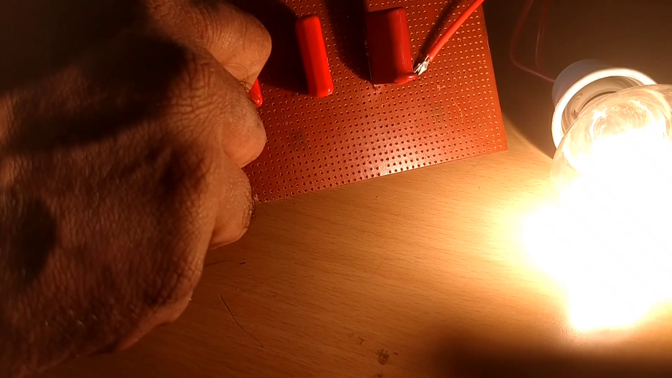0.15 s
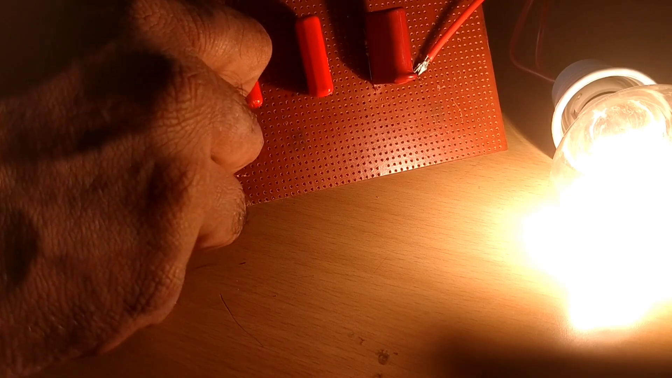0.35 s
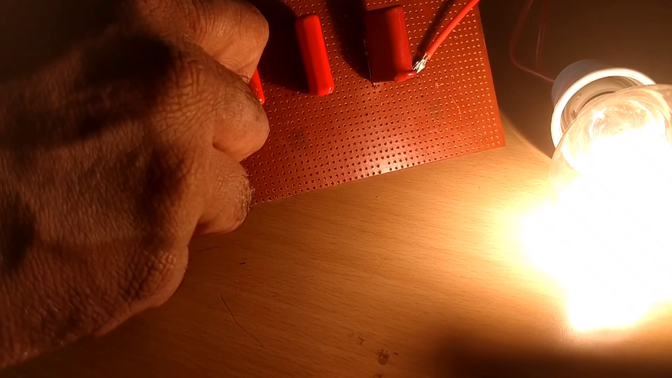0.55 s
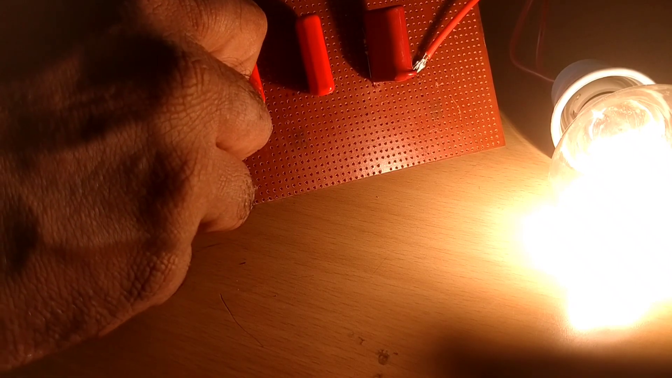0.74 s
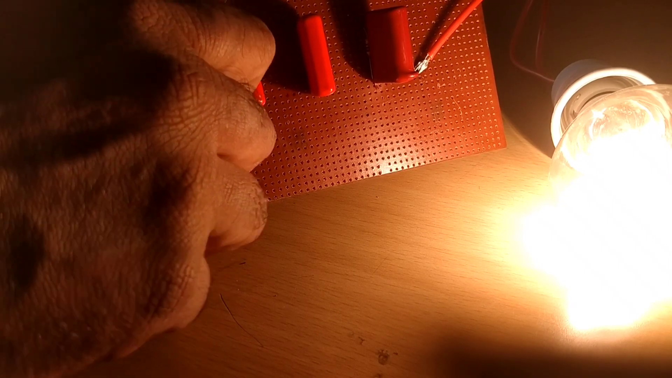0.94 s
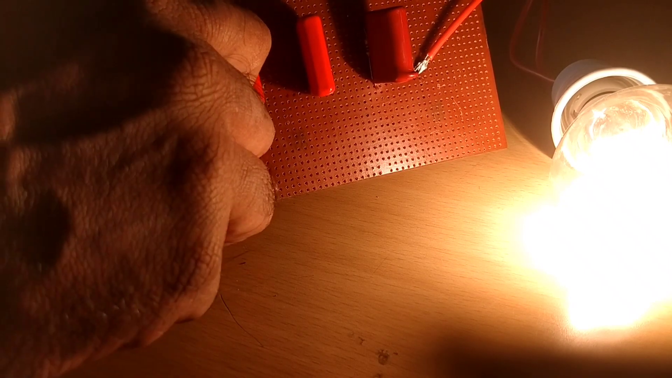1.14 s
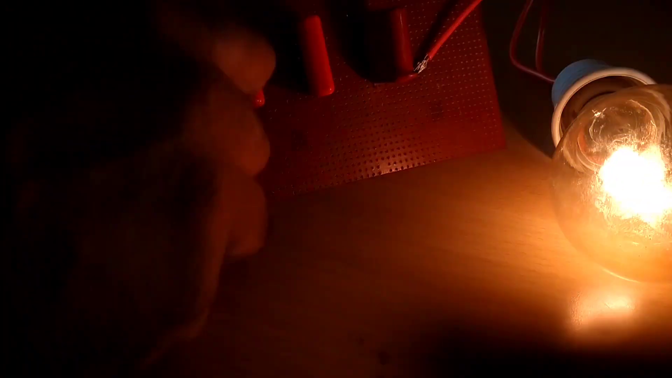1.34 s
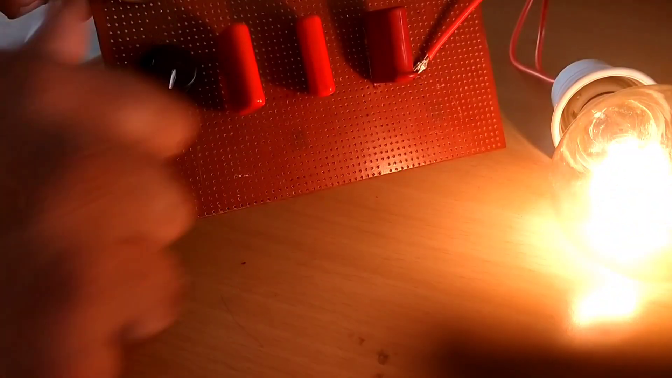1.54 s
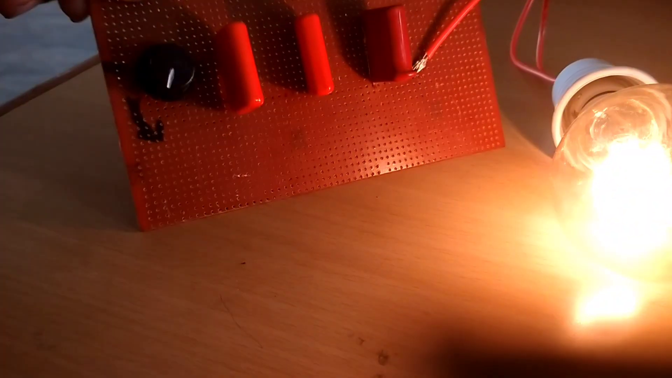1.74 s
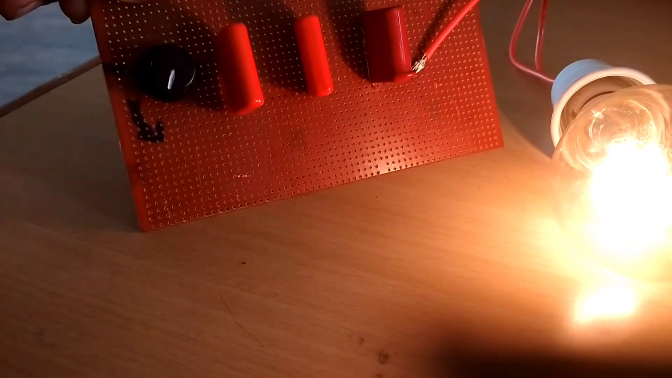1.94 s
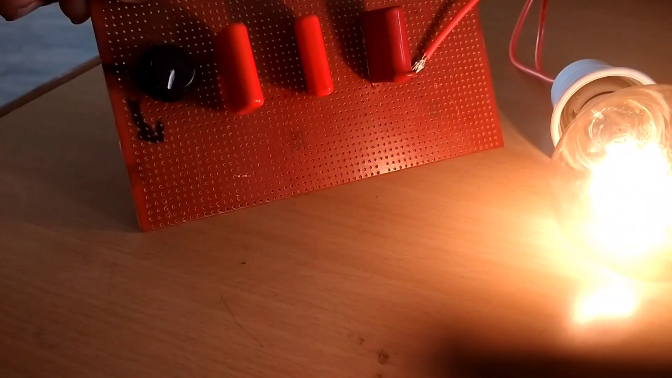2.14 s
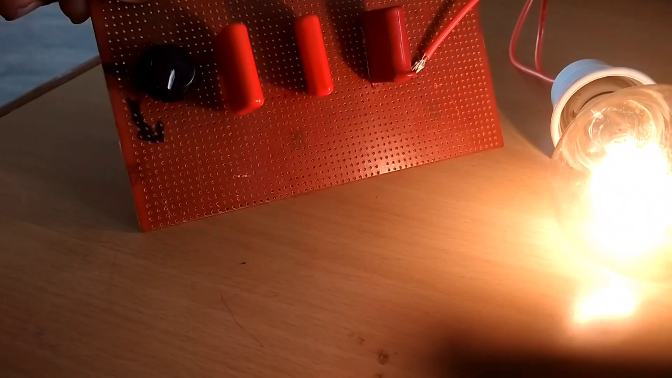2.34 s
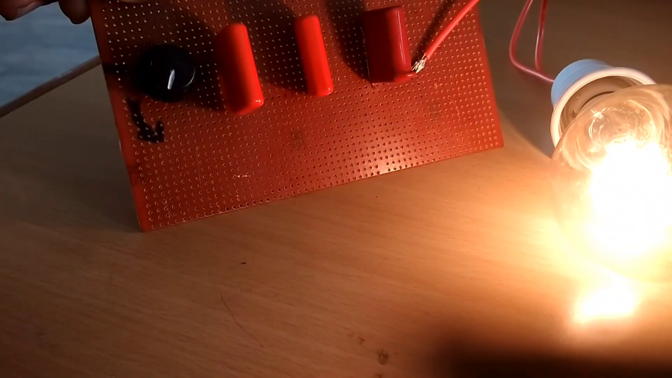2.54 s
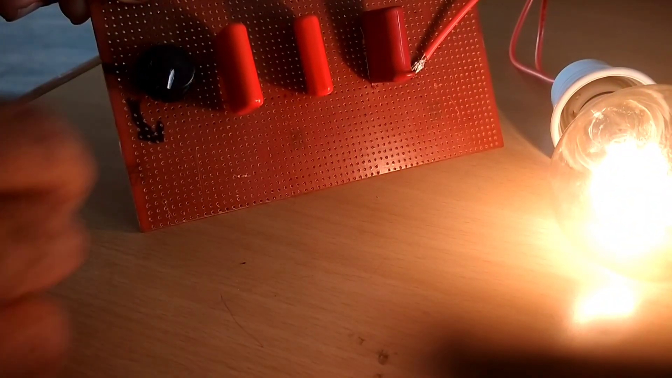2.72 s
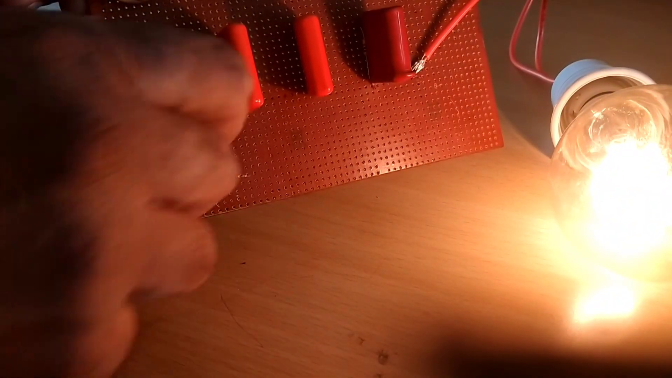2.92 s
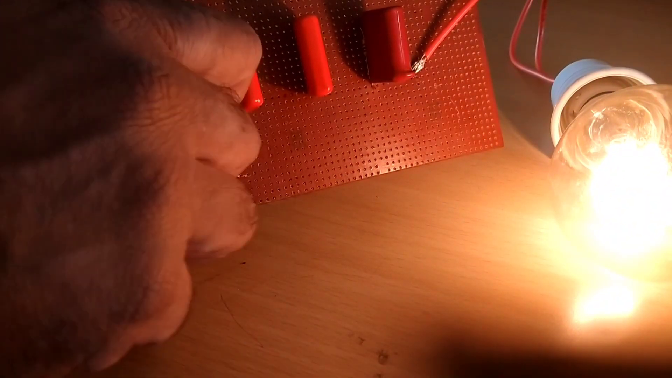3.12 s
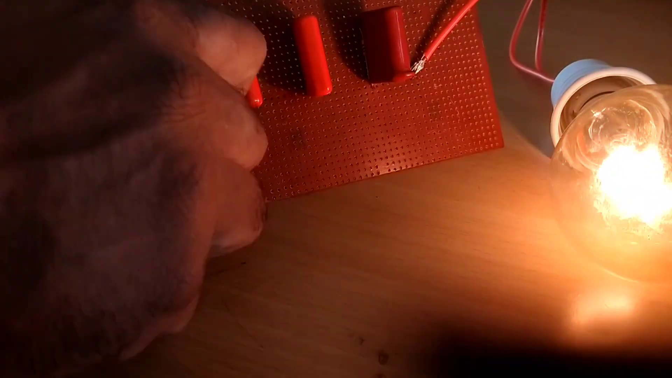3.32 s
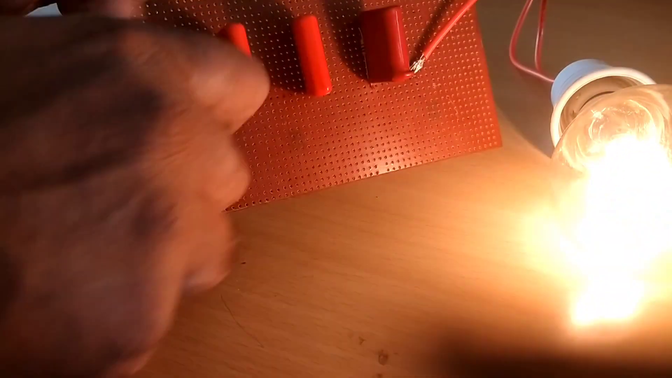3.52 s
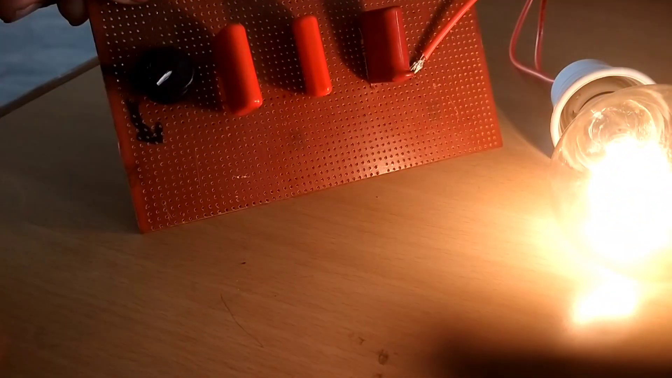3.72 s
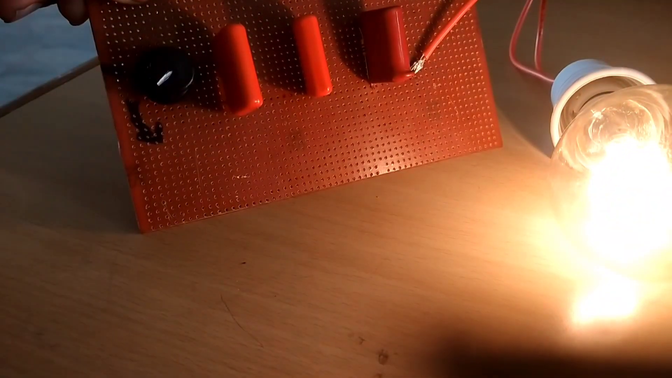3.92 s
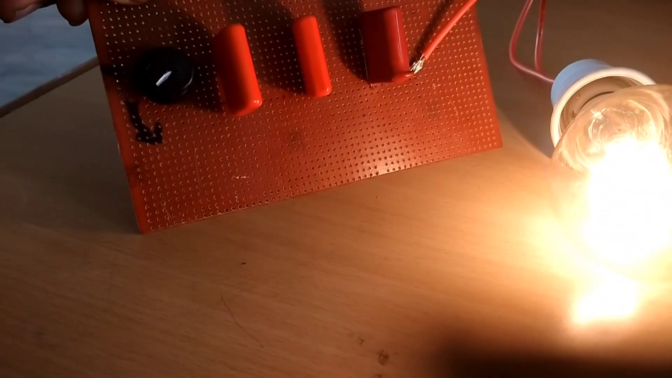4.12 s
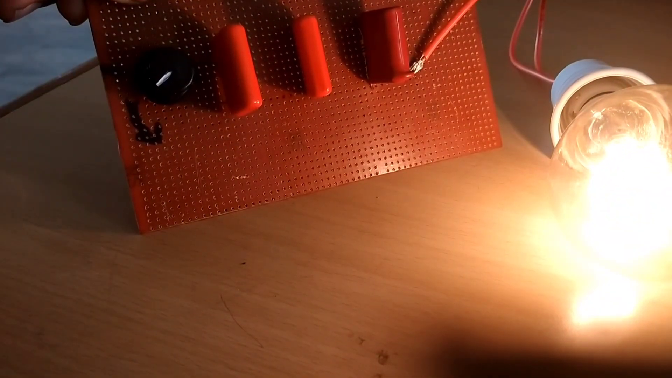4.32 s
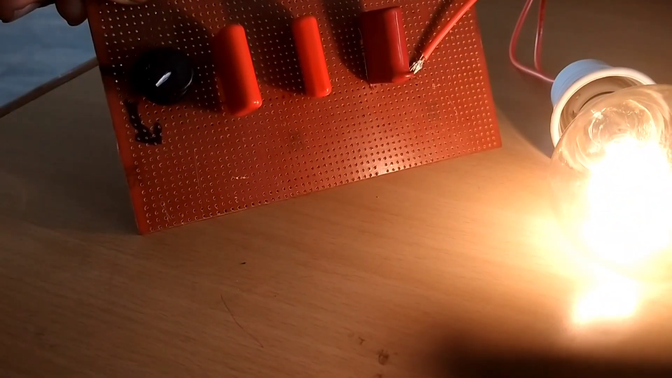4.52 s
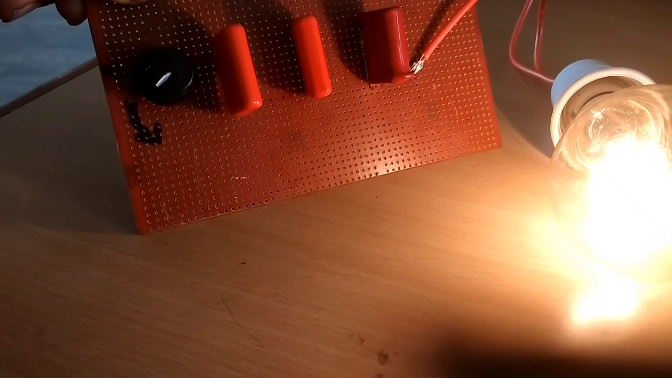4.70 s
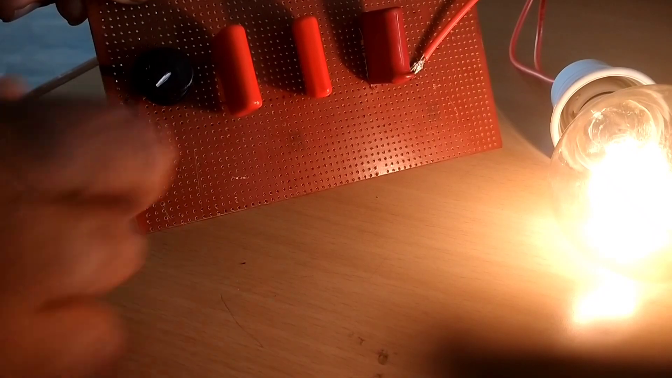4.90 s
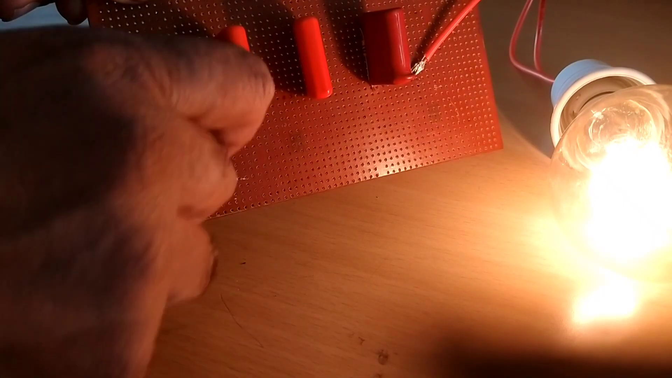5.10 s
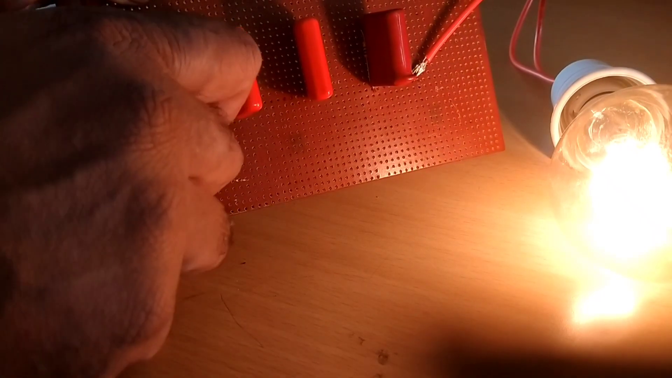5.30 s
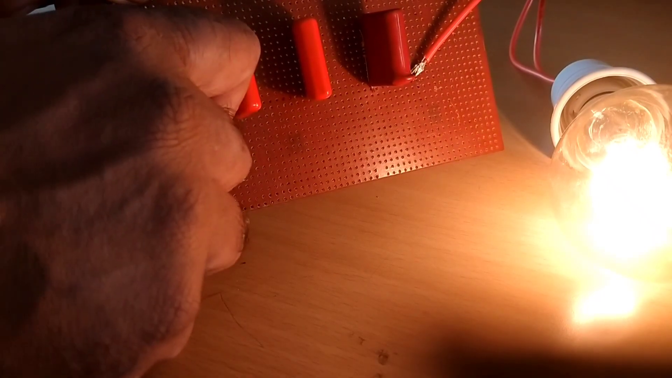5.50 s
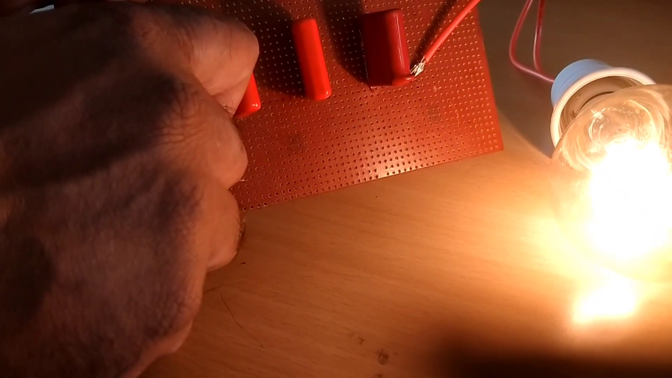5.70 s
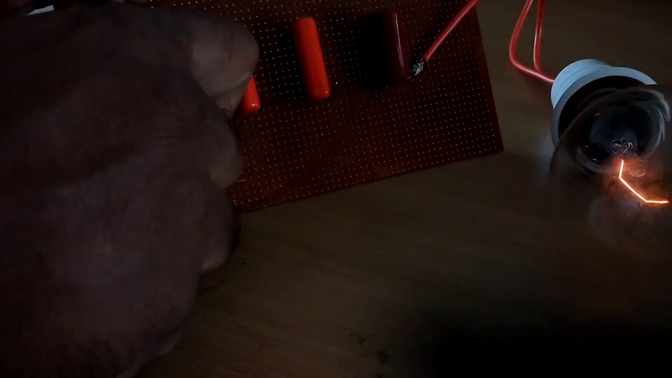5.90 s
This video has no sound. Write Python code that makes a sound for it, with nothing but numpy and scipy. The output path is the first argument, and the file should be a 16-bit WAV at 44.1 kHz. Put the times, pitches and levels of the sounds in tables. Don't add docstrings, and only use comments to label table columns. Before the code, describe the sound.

A rotary switch clicks crisply twice on a workbench while a draught thumps and flutters at the microphone over quiet room hush.

```python
import sys
import numpy as np
from scipy import signal
from scipy.fft import rfft, irfft
from scipy.io import wavfile
from scipy.ndimage import uniform_filter1d

SR = 44100
rng = np.random.default_rng(int(sys.argv[2]) if len(sys.argv) > 2 else 0)


def undo_db(level):
    steps = np.asarray(level, float) / 20
    return 10 ** steps


def waveform_to_disk(signal):
    frames = np.transpose(np.atleast_2d(signal))
    scaled = np.clip(frames, -1, 1) * 32767
    samples = np.round(scaled).astype(np.int16)
    wavfile.write(sys.argv[1], SR, samples)


N = 262433


def rms_one(x):
    return x / np.sqrt(np.mean(x ** 2) + 1e-20)


def coloured(x, spectrum):
    hz, db = np.transpose(spectrum)
    log_hz = np.log(np.arange(1, len(x) // 2 + 2) * SR / len(x))
    gain = undo_db(np.interp(log_hz, np.log(hz), db))
    return irfft(rfft(x) * gain, len(x))


def drift(rate_hz):
    r = np.exp(-2 * np.pi * rate_hz * 40 / SR)
    noise = rng.standard_normal(N // 40 + 2002)
    slow = signal.lfilter([1], [1, -2 * r, r * r], noise)[2000:]
    return np.interp(np.arange(N) / 40, np.arange(len(slow)), rms_one(slow))


def band(low_hz, high_hz, order=2):
    sos = signal.butter(order, [low_hz, high_hz], "band", fs=SR, output="sos")
    return rms_one(signal.sosfilt(sos, rng.standard_normal(N + SR))[SR:])


def background():
    # frequency in Hz, level in dB per Hz.
    hush_colour = [(88, -53), (150, -8), (264, -18), (302, -8), (333, -15), (421, -6), (501, 0),
                   (542, -3.5), (609, -6.5), (658, -3), (784, -1.5), (1140, -4.5), (2470, -8.5),
                   (5820, -31), (15700, -38)]
    # frequency in Hz, width in Hz, level in dB.
    duct = [(434.7, 65, -67), (1155, 100, -66), (1262, 62, -68), (2396, 35, -79), (2486, 27, -81)]
    # frequency in Hz, level in dB (each tone peaks 3 dB below it).
    hum_tones = [(100, -60.5), (150, -69), (200, -66.5), (300, -62.5)]
    hush = undo_db(-57 + 0.7 * drift(9.6)) * rms_one(coloured(rng.standard_normal(N), hush_colour))
    vent = np.zeros(N)
    for hz, width, db in duct:
        vent += undo_db(db + 0.66 * drift(9.8)) * band(hz - width / 2, hz + width / 2)
    t = np.arange(N) / SR
    hum = sum(undo_db(db - 3) * np.sin(2 * np.pi * hz * t) for hz, db in hum_tones)
    return hush + vent + hum


def draught():
    # time in seconds, strength in dB.
    strength = [(0.0, -44.5), (0.2, -41.5), (0.46, -50.5), (1.14, -44), (1.36, -43), (1.59, -47),
                (1.77, -42), (2.29, -41), (2.6, -50), (2.98, -42.5), (3.3, -42.5), (3.86, -41.5),
                (4.17, -50), (4.32, -55), (4.56, -51.5), (4.76, -46), (5.25, -40.5), (5.95, -47.5)]
    # start in seconds, length in seconds, level in dB.
    flurries = [(0.0, 0.3, -49), (0.637, 0.11, -46.5), (.95, 0.41, -45), (1.517, 0.36, -40),
                (1.964, 0.53, -40), (2.548, 0.067, -40.5), (2.933, 0.23, -44), (3.355, 0.26, -40.5),
                (3.669, 0.27, -39), (4.062, 0.086, -44.5), (4.254, 0.03, -48), (4.614, 0.21, -43),
                (4.836, 0.047, -43.5), (5.0, 0.34, -41.5), (5.457, 0.089, -43), (5.615, 0.15, -42.5),
                (5.8, 0.041, -60)]
    edge_s, lull_db = 0.03, -15.5
    t = np.arange(N) / SR
    level_db = np.interp(t, *np.transpose(strength))
    flurry = undo_db(level_db + lull_db)
    for start, length, db in flurries:
        inside_s = np.minimum(t - start, start + length - t)
        flurry += undo_db(db) * np.clip(inside_s / edge_s + 0.5, 0, 1)
    lump = drift(23.7)
    slow = undo_db(level_db + 4.0 + 3.93 * lump) * band(18.7, 73.6)
    small = flurry * undo_db(-4.5 + 4.23 * lump + 0.88 * drift(23)) * band(84.7, 196.6)
    whip = flurry * undo_db(-32 + 2.0 * lump + 8.8 * drift(69.5)) * band(160, 460, order=3)
    return slow + small + whip


def eddies(table, cycles, lift_db):
    out, turns = np.zeros(N), rng.random(len(table))
    for (s, db, hz), turn in zip(table, turns):
        t = np.arange(int(2 * cycles * SR / hz)) / SR
        swell = np.sin(np.pi * t * hz / (2 * cycles)) ** 2
        swing = np.sin(2 * np.pi * (hz * t + turn)) * swell
        at = max(int(s * SR) - len(t) // 2, 0)
        out[at:at + len(t)] += (undo_db(db + lift_db) * swing)[:N - at]
    return out


def slaps():
    # centre in seconds, peak in dB, frequency in Hz.
    jabs = [(.052, -29, 128), (.194, -28, 128), (1.009, -27, 120), (1.161, -24.5, 116), (1.559, -21, 114),
            (1.62, -25.5, 366), (1.743, -24, 440), (2.058, -33, 332), (2.255, -25, 136), (2.404, -25, 103),
            (3.169, -22, 114), (3.355, -22.5, 120), (3.421, -27, 110), (3.49, -24, 119), (3.52, -22, 142),
            (3.74, -31, 116), (3.81, -22, 140), (3.824, -29, 404), (3.876, -21, 163), (4.699, -26, 126.4),
            (4.748, -25, 143), (5.058, -33, 109), (5.125, -33, 350), (5.135, -25, 130), (5.178, -28, 380),
            (5.388, -26, 122)]
    # centre in seconds, peak in dB, frequency in Hz.
    heaves = [(0.691, -26.5, 38), (0.74, -27, 42.7), (0.953, -29, 48.3), (1.244, -19, 52), (1.356, -29, 48),
              (1.547, -26, 51.7), (1.636, -18.5, 58), (1.669, -27, 59.4), (1.736, -27, 50.5),
              (1.799, -37, 49), (1.837, -24, 43), (1.912, -22.5, 50), (1.997, -24, 52), (2.078, -27, 51),
              (2.143, -19.5, 52), (2.173, -35, 48), (2.297, -20, 53.3), (2.369, -18, 48.4),
              (2.466, -29.5, 53.4), (2.575, -23.5, 49), (3.134, -21.5, 53), (3.201, -26, 45),
              (3.3, -22.5, 51), (3.393, -21.5, 54.7), (3.481, -26, 49.6), (3.805, -23, 60),
              (3.893, -26, 50), (4.272, -25, 50), (4.747, -22.5, 51.4), (5.499, -26, 45.6)]
    # centre in seconds, peak in dB, frequency in Hz.
    flicks = [(1.24, -31, 280), (1.352, -30, 240), (1.62, -55, 332), (1.635, -32, 287), (1.643, -23.5, 282),
              (1.746, -33, 293), (2.086, -23.5, 269), (2.136, -36, 290), (2.156, -27, 260),
              (3.128, -37.0, 297), (3.371, -35, 282), (3.384, -31, 274), (3.468, -26, 268),
              (3.52, -26, 260), (3.541, -40.5, 302), (3.809, -30, 293), (3.824, -23, 400),
              (3.876, -33.5, 306), (4.636, -32, 260), (4.651, -30.5, 280), (4.749, -37.0, 258),
              (5.035, -31, 279), (5.168, -27, 287), (5.179, -30, 342), (5.23, -33, 313), (5.286, -27, 290),
              (5.358, -32, 296), (5.37, -26, 317), (5.487, -27.5, 282), (5.499, -27.5, 336)]
    # centre in seconds, peak in dB, frequency in Hz.
    single_slaps = [(1.248, -29, 114), (1.351, -25.5, 135), (1.62, -35, 112), (1.651, -24, 102),
                    (1.743, -20, 142), (1.91, -27.5, 110), (1.998, -28.5, 128), (2.064, -25.5, 133),
                    (2.087, -26, 135), (2.12, -23, 120), (2.152, -24.5, 113), (2.177, -26, 105),
                    (2.202, -29, 124), (2.298, -24.5, 114), (2.374, -24.5, 123), (2.45, -25.5, 114),
                    (3.131, -28.5, 138), (3.378, -35.5, 133), (3.451, -27, 134), (3.476, -27.5, 114),
                    (3.56, -31, 109), (3.825, -25.5, 134), (3.849, -28, 117), (4.651, -27.5, 97),
                    (5.017, -27, 113), (5.167, -24, 151), (5.359, -25.5, 130), (5.484, -28, 131),
                    (5.499, -23.5, 134), (5.716, -28, 118)]
    big = eddies(heaves, cycles=0.98, lift_db=-2.9)
    sharp = eddies(single_slaps, cycles=1.05, lift_db=2.0)
    quick = eddies(flicks, cycles=1.633, lift_db=-2.37)
    abrupt = eddies(jabs, cycles=0.762, lift_db=-1.8)
    return big + sharp + quick + abrupt


def ring(clicks, modes):
    out = np.zeros(N)
    for k, (hz, db, t60) in enumerate(modes):
        r, w = undo_db(-60 / (t60 * SR)), 2 * np.pi * hz / SR
        ringing = signal.lfilter([0, np.sin(w)], [1, -2 * r * np.cos(w), r * r], clicks + 1e-18)
        out += (-1) ** k * undo_db(db) * ringing
    return out


def switch():
    # time in seconds, then shell,
    # spring and board strength in dB.
    contacts = [(.8366, -64, -58, -64), (1.2439, -36, -34, -41), (1.2444, -34, -25, -40),
                (1.2450, -27, -25, -35), (1.2455, -36, -14, -38), (1.2462, -24, -21, -35),
                (1.2468, -25, -26, -38), (1.2475, -32, -29, -36), (1.2482, -35, -32, -40),
                (1.2489, -39, -33, -35), (1.2503, -48, -44, -43), (1.2555, -62, -57, -44),
                (1.3665, -58, -60, -46), (3.3590, -20, -21, -37), (3.3597, -20, -29, -39),
                (3.3603, -24, -18, -44), (3.3605, -20, -2.5, -44), (3.3619, -29, -23, -44),
                (3.3624, -30, -24, -44), (3.3634, -38, -26, -46), (3.3645, -41, -37, -44),
                (3.3656, -46, -35, -50), (3.3665, -47, -37, -44), (3.3692, -50, -46, -35),
                (3.3707, -56, -56, -37), (3.3765, -56, -56, -41), (1.2635, -60, -58, -42)]
    # frequency in Hz, level in dB, 60 dB decay in seconds.
    shell = [(4730, -22, 0.0013), (6300, -13.5, .0015), (7070, -8.5, 0.0033), (8530, 1, .005),
             (9130, -8.5, 0.0043), (10000, -6, 0.0025)]
    # frequency in Hz, level in dB, 60 dB decay in seconds.
    spring = [(11600, -21.5, 0.0011), (12700, -8.5, 0.0025), (13700, -1, .002), (14300, 3, .002),
              (15430, -3.5, .002)]
    # frequency in Hz, level in dB, 60 dB decay in seconds.
    board = [(1187, 0.5, 0.006), (2070, -5, 0.0083), (3610, 3, 0.00053)]
    s, *strengths_db = np.transpose(contacts)
    signs = rng.choice([-1, 1], (3, len(s)))
    clicks = np.zeros((3, N))
    clicks[:, np.round(s * SR).astype(int)] = undo_db(strengths_db) * signs
    return ring(clicks[0], shell) + ring(clicks[1], spring) + ring(clicks[2], board)


def room():
    # time in seconds, level in dB.
    snaps = [
        (1.2461, -1),
        (3.3596, 2),
    ]
    # delay in seconds, level in dB, smear in seconds.
    first_echoes = [(.005, -46.5, .003), (.012, -57, .003), (0.0164, -39, .0013), (0.0214, -45.5, .0018),
                    (0.026, -42, .0015), (0.0384, -44, .002), (.043, -43.5, .002), (.053, -50.5, .002),
                    (0.066, -50.5, .003)]
    # frequency in Hz, level in dB per Hz.
    near_walls = [(1200, -30), (2200, -7.5), (4100, -17), (5600, -19.5), (7000, -9.5), (8350, 0.5),
                  (9400, -3.5), (10800, -14), (12300, -8.5), (13700, 1), (15000, -0.5), (15900, -10)]
    # frequency in Hz, level in dB per Hz.
    far_walls = [(3000, -37), (5000, -13), (6300, -17.5), (7300, -9), (8430, 0), (9500, -17), (11300, -13),
                 (13500, -14), (15900, -1.5)]
    early_db, early_t60_s = -51.5, 0.93
    late_db, late_t60_s = -55, 1.54
    out, t = np.zeros(N), np.arange(SR) / SR
    echo_power = sum(undo_db(2 * db) * np.exp(-((t - s) / smear) ** 2) for s, db, smear in first_echoes)
    build = np.clip((t - 0.006) / 0.035, 0, 1)
    early = np.hypot(np.sqrt(echo_power), build * undo_db(early_db - 60 * t / early_t60_s))
    late = build * undo_db(late_db - 60 * t / late_t60_s)
    for s, db in snaps:
        near = rms_one(coloured(rng.standard_normal(SR), near_walls))
        far = rms_one(coloured(rng.standard_normal(SR), far_walls))
        out[round(s * SR):][:SR] += undo_db(db) * (early * near + late * far)
    return out


def fingers():
    # loudest moment in seconds, level in dB, rise and fall in seconds.
    brushes = [
        (1.69, -68, 0.14, 0.13),
        (2.75, -82.5, 0.31, 0.44),
        (3.79, -65.5, 0.075, 0.087),
        (4.88, -83.5, 0.28, .2),
    ]
    # frequency in Hz, level in dB per Hz.
    skin = [(2350, -48), (4000, -10), (4830, -12), (5420, -11.5), (8220, -5), (10600, -14.5), (13900, -5),
            (15000, 0.5), (15700, -2.5)]
    t = np.arange(N) / SR
    level = undo_db(-80.5 + 0.8 * drift(2.8))
    for s, db, rise, fall in brushes:
        level += undo_db(db) * np.exp(-2 * ((t - s) / np.where(t < s, rise, fall)) ** 2)
    stutter = undo_db(8.5 + 1.95 * drift(70))
    return level * stutter * rms_one(coloured(rng.standard_normal(N), skin))


def starved(x, blows, depth_db, split_hz):
    force = uniform_filter1d(np.abs(np.gradient(blows)), size=160)
    late = np.roll(force / force.max(), round(0.0093 * SR))
    high = signal.sosfiltfilt(signal.butter(2, split_hz, "high", fs=SR, output="sos"), x)
    loss_db = np.minimum(depth_db * late ** 1.5, 14)
    return x + high * (undo_db(-loss_db) - 1)


def scene():
    wind = slaps() + draught()
    faint = starved(background() + fingers(), wind, depth_db=23.5, split_hz=3400)
    top = signal.cheby2(20, 50, 16000, fs=SR, output="sos")
    snap_top = signal.cheby2(20, 50, 17000, fs=SR, output="sos")
    mix = signal.sosfilt(snap_top, switch()) + signal.sosfilt(top, wind + room() + faint)
    return mix[None]


def top_cut(x):
    return signal.sosfilt(signal.butter(12, 17000, fs=SR, output="sos"), x)


def record(dry):
    return top_cut(dry)


dry = scene()
out = record(dry)
waveform_to_disk(out)
```